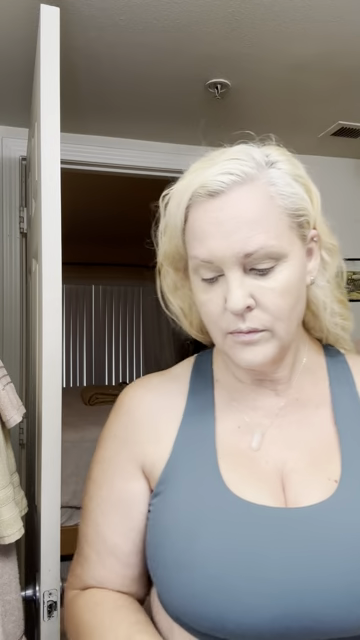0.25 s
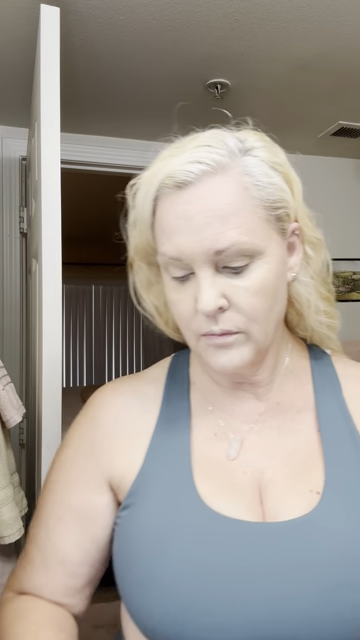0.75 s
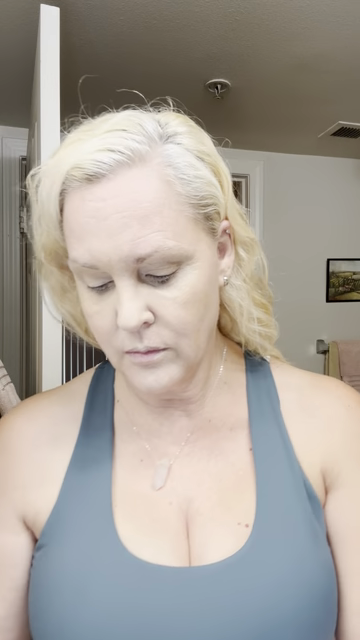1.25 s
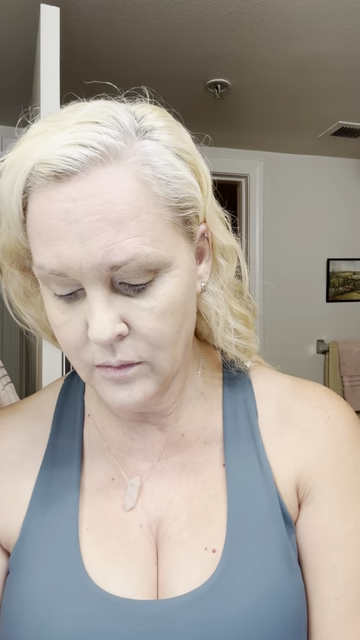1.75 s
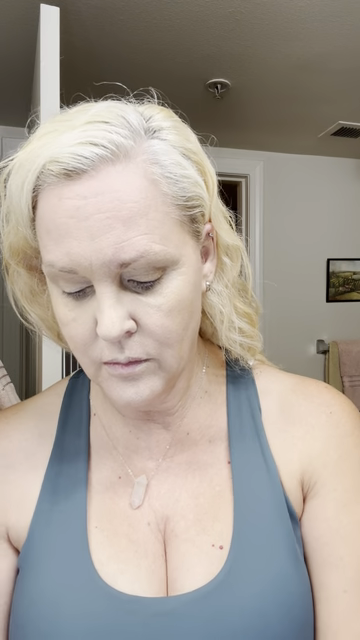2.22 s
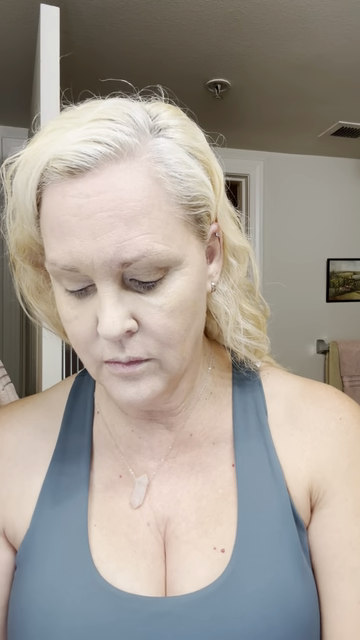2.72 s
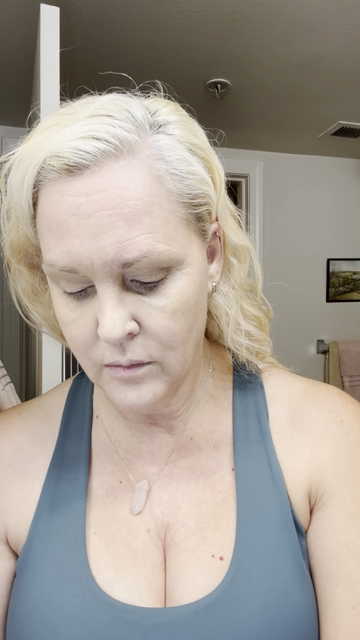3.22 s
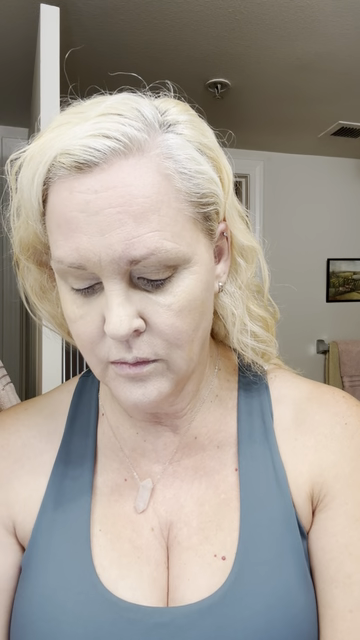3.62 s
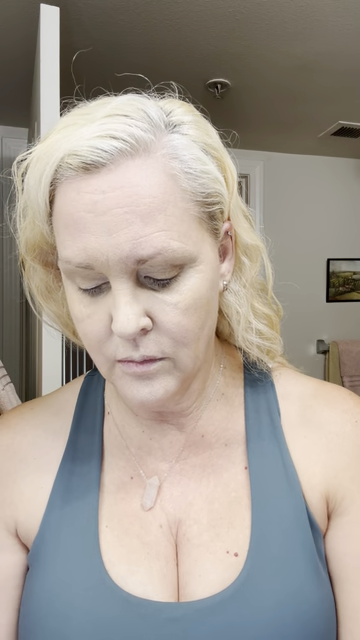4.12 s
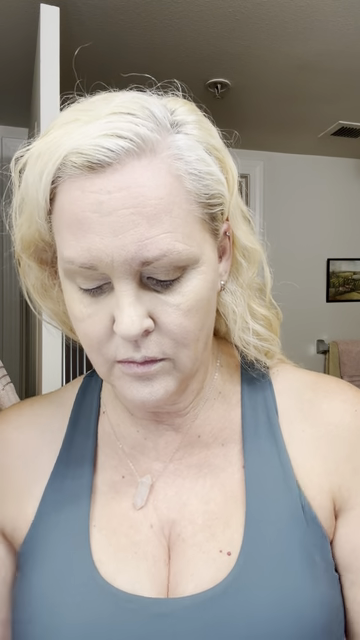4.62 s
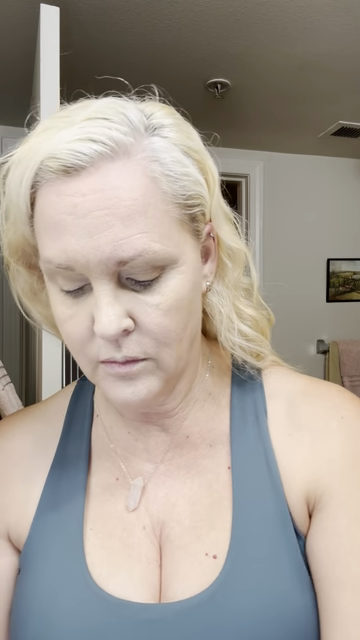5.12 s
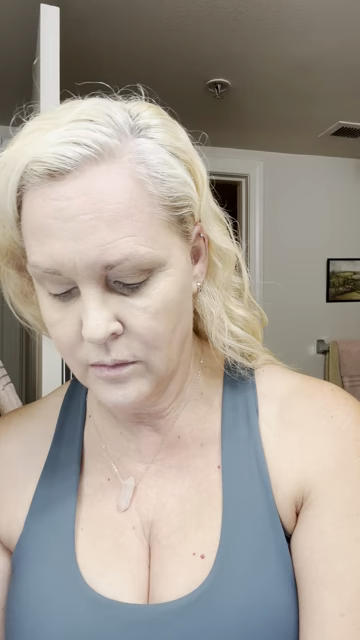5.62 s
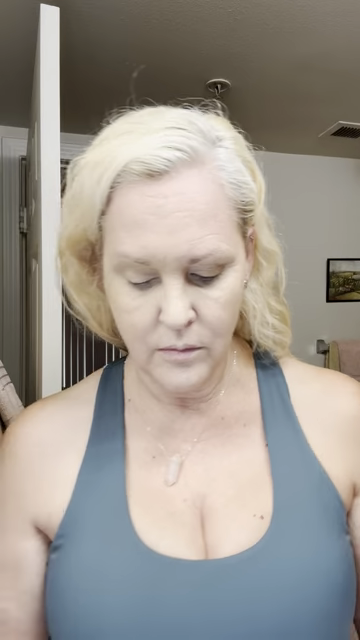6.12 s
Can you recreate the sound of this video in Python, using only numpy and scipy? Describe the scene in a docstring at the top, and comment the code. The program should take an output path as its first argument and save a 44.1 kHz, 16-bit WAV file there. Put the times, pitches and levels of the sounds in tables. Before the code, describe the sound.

In a small hard room, little cosmetic cases tick, clack and knock down on a hollow-sounding counter while a fan hums softly.

```python
"""You hear small plastic and glass makeup containers picked up and set down on a bathroom counter.
Each lands on an edge and rocks flat in quicker, softer contacts: noise bursts shaped by a shell
resonance, with fading sine tones for the slab and the hollow cabinet below. Containers clack, lids tick
and fingers rub in between, made from shaped noise, and clacks add shell tones. The small hard room
answers with echoes and a fading noise tail, while a fan hums quietly as filtered noise and sine tones."""
import sys
import numpy as np
from scipy import signal
from scipy.fft import rfft, irfft, next_fast_len
from scipy.io import wavfile
from scipy.ndimage import map_coordinates

SR = 44100
rng = np.random.default_rng(int(sys.argv[2]) if len(sys.argv) > 2 else 0)


def master_out(mix):
    """Clip the mix to full scale and print it as 16-bit PCM to the path in sys.argv[1]."""
    frames = np.transpose(np.atleast_2d(mix))
    ceiling = np.clip(frames, -1, 1)
    pcm = np.round(ceiling * 32767).astype(np.int16)
    wavfile.write(sys.argv[1], SR, pcm)


N = 280561  # length in samples

# Rush of air from the fan, before its overall level. Each row: frequency in Hz, level in dB.
FAN_AIR = [(20, -14), (60, -4.5), (125, 7.5), (190, -4.5), (285, -2), (370, -7.5), (600, -14), (900, -11),
           (1150, -11.5), (2000, -8.5), (3300, -20), (5500, -30), (8000, -45.5), (12500, -44.5),
           (14300, -43), (16000, -75.5)]
# Fan motor and blade tones. Each row: frequency in Hz, level in dB.
FAN_HUM = [(58, -66), (120, -83), (236, -63.5), (275, -68.5), (299, -63.5), (465, -75), (892, -72.5),
           (1190, -78.5), (1535, -72.5), (1965, -71)]
# Fingers and containers sliding. Each row: center in seconds, half length in seconds, level in dB.
RUBS = [(.188, 0.016, -71), (0.328, .02, -63.5), (0.54, 0.041, -69), (1.04, 0.018, -72),
        (1.206, 0.1, -75.5), (2.366, .015, -71.5), (2.88, 0.11, -74), (3.061, 0.0097, -58.5),
        (3.24, 0.05, -54.5), (5.187, 0.035, -68)]
# Soft pushes and drags on the counter.
# Each row: center in seconds, half length in seconds, level in dB, pitch in Hz.
BUMPS = [(1.048, 0.04, -46, 102), (3.284, 0.074, -46, 260), (5.351, 0.028, -45.5, 252)]
# Colour of a push, moved up or down with its pitch. Each row: frequency in Hz, level in dB.
PUSH_COLOUR = [(25, -37), (65, -11), (105, 13.5), (170, 7.5), (300, -9), (500, -10.5), (1200, -40),
               (4000, -73)]
# Light ticks of nails and lids. Each row: start in seconds, snap level in dB, body level in dB.
TICKS = [(.267, -24, -14.5), (.337, -13, -11.5), (.487, -11.5, -40), (.523, -23, -17), (.741, -27, -17),
         (.890, -21.5, -31), (3.112, -34.5, -0.5), (3.1186, -26.5, 5), (4.040, -22, -17.5),
         (4.923, -43.5, -21.5), (5.225, -33, -1.5), (5.2597, -35, -1)]
# Bright colour of a tiny hard contact. Each row: frequency in Hz, level in dB.
SNAP_COLOUR = [(100, -45), (1500, -7), (5500, -4), (6800, -3), (8000, -3.5), (9300, -4), (11500, -6),
               (13900, -2), (15000, -2), (16000, -20)]
# Colour of a small case. Each row: frequency in Hz, level in dB.
BODY_COLOUR = [(100, -4), (700, -7), (1600, -5), (3000, -9), (5500, -18), (8000, -29.5), (16000, -42)]
# Containers clacking against each other. Each row: start in seconds, shell level in dB, shell pitch in Hz,
# upper mode in Hz, upper mode over shell in dB, snap over shell in dB.
CLACKS = [(1.206, -3.5, 2460, 4680, -5, -34), (1.7065, 26, 2654, 5160, -17.5, -34.5),
          (1.708, 20, 3234, 4000, -11, -38.5), (2.458, -4, 2180, 4670, -3, -11.5),
          (4.4113, 16.5, 2440, 4250, -12.5, -20.5), (4.4288, 22.5, 2400, 3710, -21.5, -27.5),
          (5.1743, 22, 2193, 3290, -7, -71)]
# Containers touching down on the counter. Each row: start in seconds, knock level in dB, thud pitch in Hz,
# contact hardness in Hz, shell pitch in Hz, shell over knock in dB, first rock in seconds,
# loss per rock in dB.
LANDINGS = [(1.669, 21, 140, 1980, 1490, -2, 0.011, 4), (1.782, 0, 112, 1550, 623, 7.5, .02, 7),
            (2.157, -4.5, 169, 2510, 1930, 6, .029, 11.5), (2.167, 1, 220, 5430, 1980, -6.5, .019, 6.5),
            (3.0845, 18, 227, 2630, 2370, 0, 0.014, 9), (3.264, 4, 300, 3420, 1590, -16, 0.066, 5.5),
            (3.5204, 19.5, 164, 2980, 2575, 6.5, .0105, 4), (3.6964, 5, 84, 2770, 1640, -5, 0.042, 9),
            (5.379, 18.5, 125, 2770, 1086, 3.5, .008, 12.5), (5.535, -5, 109.5, 2490, 1080, 10, 0.0068, 4),
            (5.545, 5.5, 113, 2050, 940, 5.5, .039, 7.5)]
# Colour of a knock before its hardness limits the treble. Each row: frequency in Hz, level in dB.
KNOCK_COLOUR = [(25, -52), (55, -8), (90, -9), (300, -3.5), (600, -3), (1200, -3), (2500, -2), (5500, -10),
                (7500, -16), (16000, -38)]
# Hollow cabinet under the counter, relative to the thud.
# Each row: frequency in Hz, level in dB, time to fall 60 dB in seconds.
CABINET_MODES = [(69, -7.5, 0.74), (84.4, -9, 1), (105.3, -3.5, 0.54), (153.6, -4.5, 0.29),
                 (199.3, 0, 0.13), (267, -4, 0.3), (365, -5, 0.2)]
# Counter slab. Each row: frequency in Hz, level relative to the blow in dB, time to fall 60 dB in seconds.
SLAB_MODES = [(543, -46, 0.2), (634, -51.5, 0.18), (786, -47, 0.14), (1018.5, -39.5, 0.084),
              (985, -76.5, 0.17), (1406, -53.5, 0.26), (1547, -39, 0.1), (1628, -42.5, 0.14),
              (2000, -49, 0.31), (2170, -45, 0.13), (2592, -40, 0.09), (2900, -52.5, .12)]
# Lean of the counter, to the right, before KNOCK_PAN_DB. Each row: frequency in Hz, left over right in dB.
COUNTER_LEAN = [(250, -2), (450, -6), (1100, -6.5), (2000, -4), (16000, -2)]
# Fading of the room's tail. Each row: frequency in Hz, time to fall 60 dB in seconds.
ROOM_DECAY = [(80, 1), (250, 0.3), (1000, 0.28), (3000, 0.22), (6000, 0.24), (13000, 0.15)]
# Stereo width of noise. Each row: frequency in Hz, side over mid in dB.
STEREO_WIDTH = [(100, -23), (200, -13.5), (400, -8), (750, -3), (1290, 0.5), (1800, -12), (2400, -5),
                (4400, -2.5), (8000, -21.5), (15000, -13.5)]
# The two microphone ports drift apart through the treble.
# Each row: frequency in Hz, phase in radians by which left leads.
PORT_PHASE = [(300, 0), (4400, 0.32), (6500, -1.9), (7400, -3), (8200, -3), (9500, -4.5), (11700, -5.5),
              (13100, -7), (15500, -10)]

TOP_HZ = 16400  # no sound above this frequency
SIZE = 2 ** 15  # samples in one contact
T, HZ = np.arange(SIZE) / SR, np.fft.rfftfreq(SIZE, 1 / SR)
SIDES = np.array([[1], [-1]])  # left, right
DIRECT_PAN_DB = 3.5  # the direct sound favours the left port
PUSH_HZ = 105  # pitch at which the push colour is unmoved
# above this level the soft skin damps the top of a rub
RUB_TOP_HZ, RUB_FIRM_DB, RUB_DULL_HZ_PER_DB = 14750, -60.5, 800
HOLLOW_DB, HOLLOW_GROWS = -3.5, 0.85  # air inside at a 0 dB clack; dB gained per dB of clack
CLACK_KNOCK_DB, CLACK_KNOCK_GROWS = -7.5, 0.5  # the same for the dull knock through the hand
# each rock over the one before: its length, its hardness, its shell pitch
ROCK_SHRINK, ROCK_SOFTEN, ROCK_DEEPEN = 0.42, 0.63, 0.665
KNOCK_SNAP_DB, KNOCK_PAN_DB = -52, 2.5  # rim snap over the knock; left over right, added to the lean
THUD_DB = -39  # cabinet thud over the knock


def amp(db):
    """Decibels to gain."""
    return 10 ** (np.asarray(db) / 20)


def unit(x):
    """Scale to rms 1."""
    return x / np.sqrt(np.mean(x ** 2) + 1e-20)


def along(points, hz=HZ):
    """Read (Hz, value) points on a log frequency axis."""
    f, v = np.transpose(points)
    return np.interp(np.log(hz + 1), np.log(f + 1), v)


def causal(gain):
    """The minimum-phase response with this magnitude: sharp start, then ringing."""
    cepstrum = irfft(np.log(np.maximum(gain, 1e-6)))
    cepstrum[1:SIZE // 2] *= 2
    cepstrum[SIZE // 2 + 1:] = 0
    return np.exp(rfft(cepstrum))


def add(track, s, sound):
    """Mix a sound in at time s."""
    part = track[:, round(s * SR):][:, :SIZE]
    part += sound[:, :part.shape[1]]


def noise(size, colour=None):
    """Stereo noise of rms 1, nearly mono in the bass and widest in the middle range."""
    m = next_fast_len(size)
    hz = np.fft.rfftfreq(m, 1 / SR)
    mid, side = rfft(rng.standard_normal((2, m)))
    width = amp(along(STEREO_WIDTH, hz))
    gain = amp(along(colour, hz)) if colour else 1
    stereo = (mid + SIDES * width * side) / np.hypot(1, width)
    return unit(irfft(gain * stereo, m)[:, :size])


def swell_at(s, half, db):
    """The smooth rise and fall of one stroke."""
    t = np.arange(N) / SR
    return amp(db) * np.exp(-((t - s) / half) ** 2 / 2)


def wobble(rate):
    """A smooth random curve, rate knots a second."""
    knots = rng.standard_normal(int(N * rate / SR) + 4)
    return map_coordinates(knots, [np.arange(N) * rate / SR])


def shell(hz, q, skirt=1.0):
    """A shell resonance: a peak at hz, sharper for a higher q, with steep skirts."""
    return 1 / (1 + (q * (HZ / hz - hz / (HZ + 1))) ** 2) ** skirt


def ring(modes, swell, spread_db=2):
    """Modes (Hz, dB, t60) build up and die away, at new random strengths for each blow."""
    hz, db, t60 = np.transpose(modes)[:, :, None]
    strength = amp(db + spread_db * rng.standard_normal(hz.shape) - 60 * T / t60)
    tones = np.sin(2 * np.pi * (hz * T + rng.random(hz.shape)))
    return np.sum(strength * tones, 0) * (1 - np.exp(-T / swell))


def echoes(span, count=12):
    """Sparse reflections scaled to total energy 1, fading over span seconds."""
    delays = 0.002002 + span * (np.arange(count) + rng.random(count)) / count
    sizes = rng.choice([-1, 1], count) * np.exp(-delays / span)
    return np.bincount((delays * SR).astype(int), sizes / np.linalg.norm(sizes), SIZE)


def in_room(gain, wall_db, scatter_db, scatter_t60, room_db, chatter, wall_span=0.016, scatter_rise=0.0024):
    """One contact of this colour: short chatter, mirror and wall echoes, their scatter and the room's tail."""
    # the rim touches down in a few catches: the push is spread over a moment but keeps its colour
    push = (T / chatter) ** 2 * np.exp(-3 * T / chatter)
    touch = rfft(rng.standard_normal(SIZE) * push + (T == 0) * 1e-3)
    touch = touch / causal(np.abs(touch))
    direct = (T == 0) * amp(SIDES * DIRECT_PAN_DB / 2)
    near = touch * rfft(direct + amp(wall_db) * echoes(wall_span))
    scatter = noise(SIZE) * amp(-60 * T / scatter_t60) * (1 - np.exp(-T / scatter_rise))
    # the tail fades at its own speed in each band
    hz, t, bands = signal.stft(noise(SIZE), SR, nperseg=256)
    fading = bands * amp(-60 * t / along(ROOM_DECAY, hz)[:, None])
    tail = signal.istft(fading, SR, nperseg=256)[1][:, :SIZE] * (1 - np.exp(-T / 0.0032))
    diffuse = amp(scatter_db) * unit(scatter) + amp(room_db) * unit(tail)
    paths = irfft(near) * np.exp(-T / 0.015) + diffuse / np.sqrt(SIZE)
    paths = unit(paths) / np.sqrt(SIZE)
    return signal.fftconvolve(paths, irfft(causal(gain))[None, :SIZE // 4], axes=1)[:, :SIZE]


def fan(rush_db=-55, drift=0.62, wall_db=-5):
    """A rush of air, combed by the walls, with slightly unsteady motor and blade tones."""
    t = np.arange(N) / SR
    hum = sum(amp(db) * np.sqrt(2) * np.sin(2 * np.pi * hz * t + drift * wobble(6.9))
              for hz, db in FAN_HUM)
    air = noise(N, FAN_AIR)
    # only the shorter waves bounce cleanly off the walls
    high_pass = signal.butter(2, 400, "high", fs=SR, output="sos")
    walls = signal.sosfilt(high_pass, echoes(0.022))
    reflected = signal.fftconvolve(air, walls[None], axes=1)[:, :N]
    return amp(rush_db) * (air + amp(wall_db) * reflected) + hum


def handling(grain_db=3):
    """Sliding catches and slips in fine grains, duller under a firm finger; soft pushes rumble low."""
    grains = unit(noise(N, SNAP_COLOUR) * amp(grain_db * wobble(430)))
    out = np.zeros((2, N))
    for s, half, db in RUBS:
        top_hz = RUB_TOP_HZ - RUB_DULL_HZ_PER_DB * max(db - RUB_FIRM_DB, 0)
        skin = signal.butter(4, np.clip(top_hz, 1000, 0.45 * SR), fs=SR, output="sos")
        out += signal.sosfilt(skin, grains * swell_at(s, half, db))
    for s, half, db, pitch_hz in BUMPS:
        colour = [(hz * pitch_hz / PUSH_HZ, level) for hz, level in PUSH_COLOUR]
        out += swell_at(s, half, db) * noise(N, colour)
    return out


def ticks():
    """Tiny hard contacts of nails and lids: a bright snap plus a small case, with no ringing tones."""
    out = np.zeros((2, N))
    for s, snap_db, body_db in TICKS:
        gain = amp(snap_db + along(SNAP_COLOUR)) + amp(body_db + along(BODY_COLOUR))
        add(out, s, in_room(gain, wall_db=-27, scatter_db=0.5, scatter_t60=0.045, room_db=-2.5,
                            chatter=0.0012))
    return out


def clacks(ring_db=-52, ring_t60=0.13, lower_q=5.2, upper_q=6.6, hollow_hz=1530, hollow_q=4.5):
    """Two containers meet: two shell modes and the air inside sound, but slab and cabinet do not ring."""
    out = np.zeros((2, N))
    for s, db, shell_hz, upper_hz, upper_db, snap_db in CLACKS:
        body = amp(db) * (shell(shell_hz, lower_q) + amp(upper_db) * shell(upper_hz, upper_q))
        hollow = amp(HOLLOW_DB + HOLLOW_GROWS * db) * shell(hollow_hz, hollow_q)
        knock = amp(CLACK_KNOCK_DB + CLACK_KNOCK_GROWS * db + along(KNOCK_COLOUR))
        knock = knock / np.hypot(1, (HZ / 2200) ** 2)
        snap = amp(db + snap_db + along(SNAP_COLOUR))
        gain = np.sqrt(body ** 2 + hollow ** 2 + knock ** 2 + snap ** 2)
        # the upper mode dies away sooner
        modes = [(shell_hz, db + ring_db, ring_t60),
                 (upper_hz, db + upper_db + ring_db, ring_t60 * shell_hz / upper_hz)]
        after = ring(modes, swell=0.00099)
        sound = in_room(gain, wall_db=-7, scatter_db=-1, scatter_t60=0.06, room_db=-8, chatter=0.0012)
        add(out, s, sound + after)
    return out


def rocking(count=3):
    """Split each landing into contacts that come ever quicker, weaker, softer and deeper."""
    contacts = []
    for s, db, thud_hz, hard_hz, shell_hz, shell_db, rock_s, loss_db in LANDINGS:
        for k in range(count):
            start = s + rock_s * sum(ROCK_SHRINK ** j for j in range(k))
            level = db - loss_db * k
            contacts.append((start, level, thud_hz, hard_hz * ROCK_SOFTEN ** k,
                             shell_hz * ROCK_DEEPEN ** k, level + shell_db))
    return contacts


def knocks(thud_slope_db=9, shell_q=4, coupling=0.87):
    """A container lands: the harder the contact, the higher the knock reaches; slab and cabinet ring on."""
    out = np.zeros((2, N))
    for s, db, thud_hz, hard_hz, shell_hz, shell_db in rocking():
        knock = amp(db + along(KNOCK_COLOUR)) / np.sqrt(1 + (HZ / hard_hz) ** 8)
        case = amp(shell_db) * shell(shell_hz, shell_q)
        snap = amp(db + KNOCK_SNAP_DB + along(SNAP_COLOUR))
        sound = in_room(knock + case + snap, wall_db=-2, scatter_db=1.5, scatter_t60=0.11, room_db=-4.5,
                        chatter=0.0034)
        # where it lands decides which cabinet modes answer: they weaken per octave away from the thud
        cabinet = [(hz, level + db + THUD_DB - thud_slope_db * abs(np.log2(hz / thud_hz)), t60)
                   for hz, level, t60 in CABINET_MODES]
        # the slab takes the whole knock and a share of the shell's ring
        blow = knock + coupling * case
        slab = [(hz, level + 20 * np.log10(np.interp(hz, HZ, blow)), t60)
                for hz, level, t60 in SLAB_MODES]
        add(out, s, sound + ring(cabinet, swell=0.0073) + ring(slab, swell=0.0056))
    pan_db = KNOCK_PAN_DB + along(COUNTER_LEAN, np.fft.rfftfreq(N, 1 / SR))
    return irfft(rfft(out) * amp(SIDES * pan_db / 2), N)


def scene():
    """Everything at the counter, over the fan."""
    return fan() + handling() + ticks() + clacks() + knocks()


def record(dry):
    """The phone's two microphone ports differ in phase; no sound is left above TOP_HZ."""
    m = next_fast_len(N + SIZE)
    hz = np.fft.rfftfreq(m, 1 / SR)
    ports = np.exp(1j * SIDES * along(PORT_PHASE, hz) / 2)
    return irfft(rfft(dry, m) * ports * (hz < TOP_HZ), m)[:, :N]


dry = scene()
out = record(dry)
master_out(out)
```